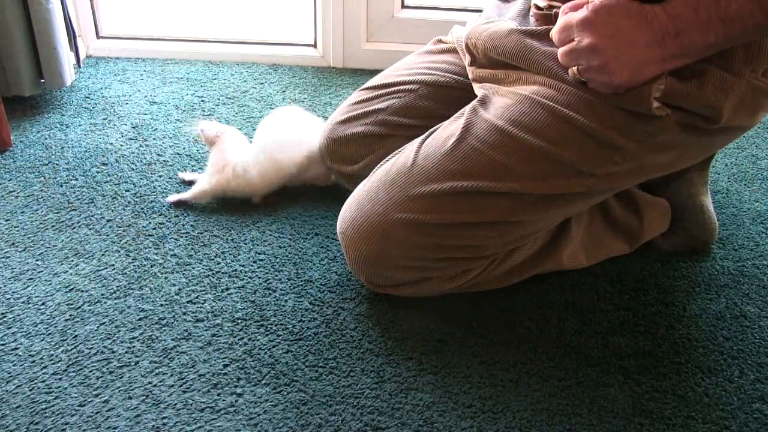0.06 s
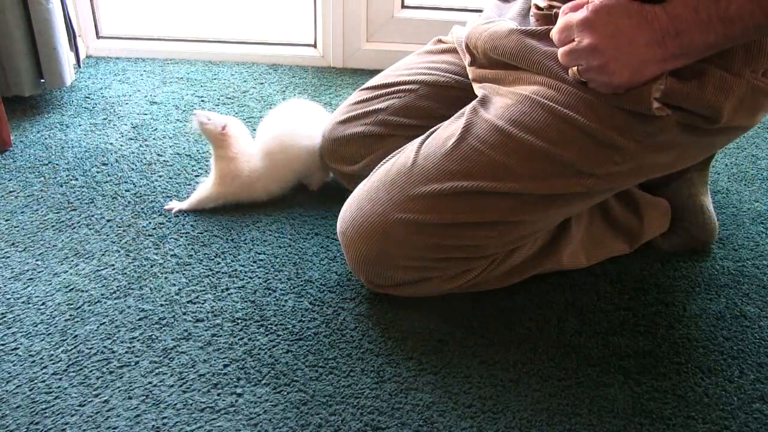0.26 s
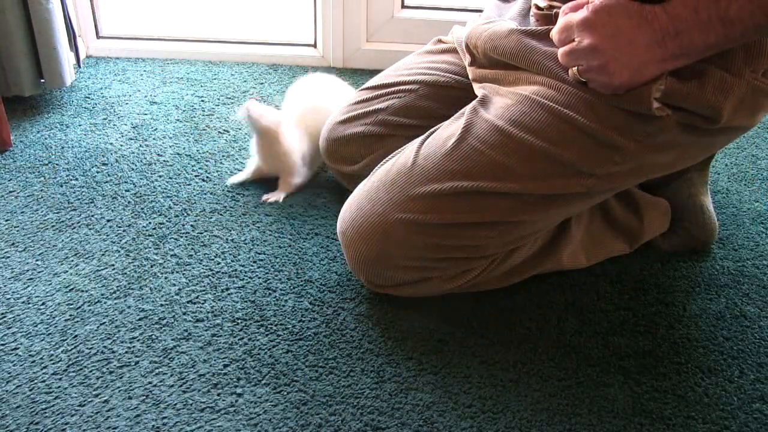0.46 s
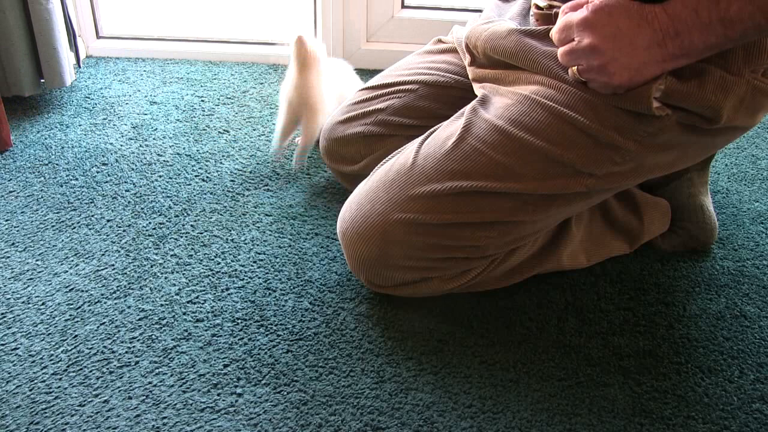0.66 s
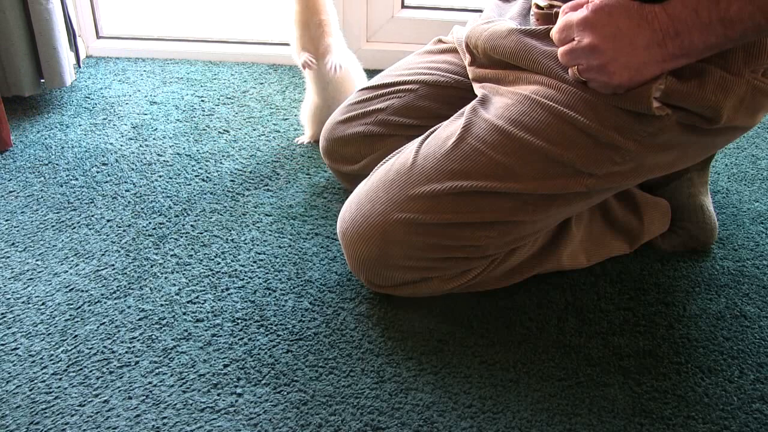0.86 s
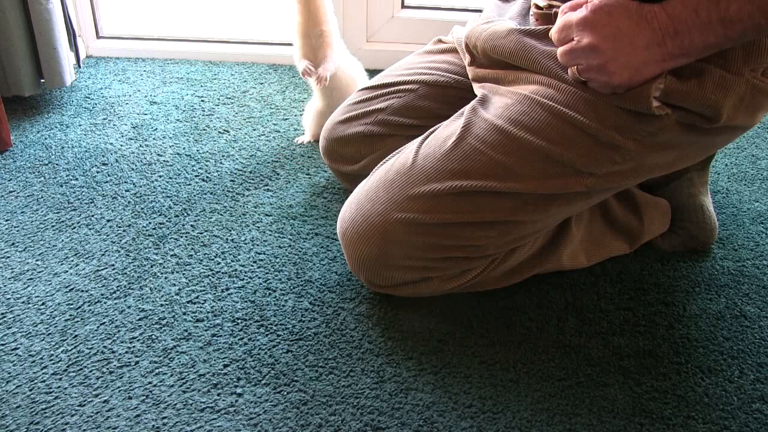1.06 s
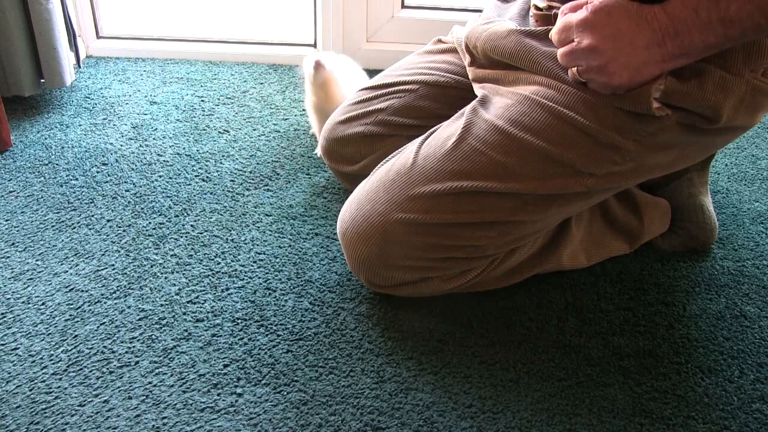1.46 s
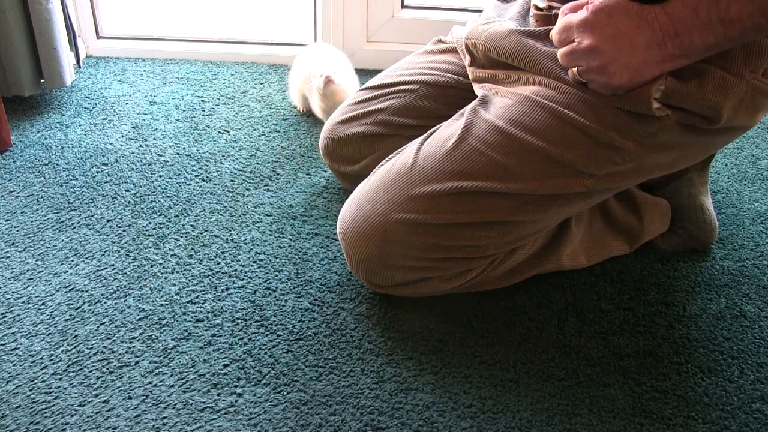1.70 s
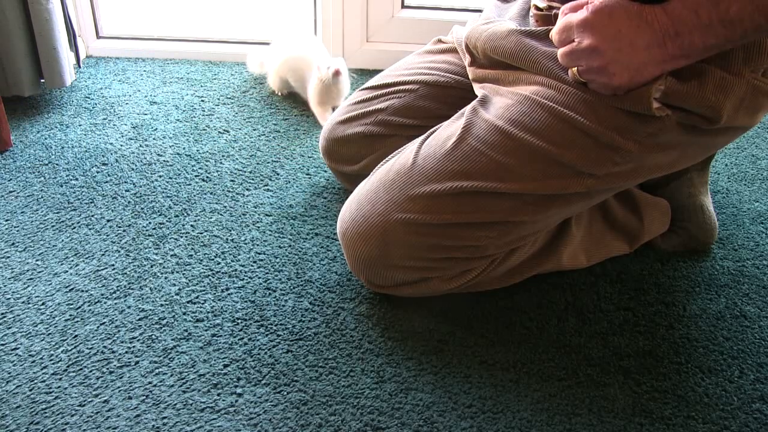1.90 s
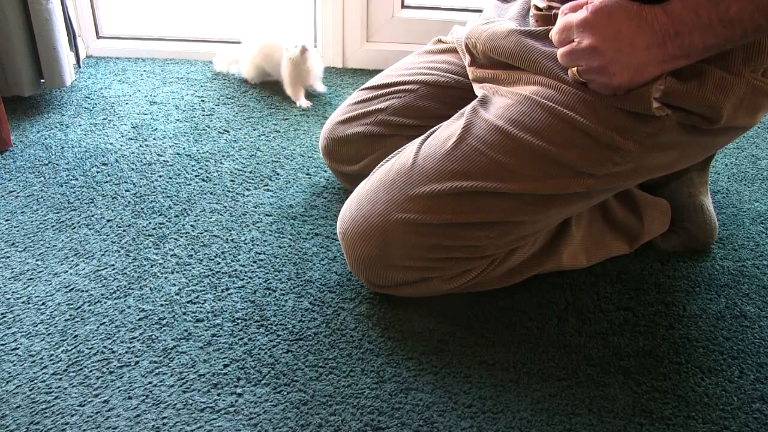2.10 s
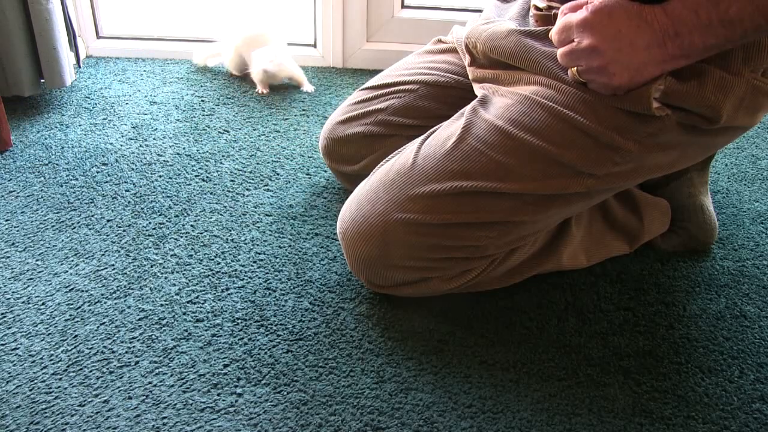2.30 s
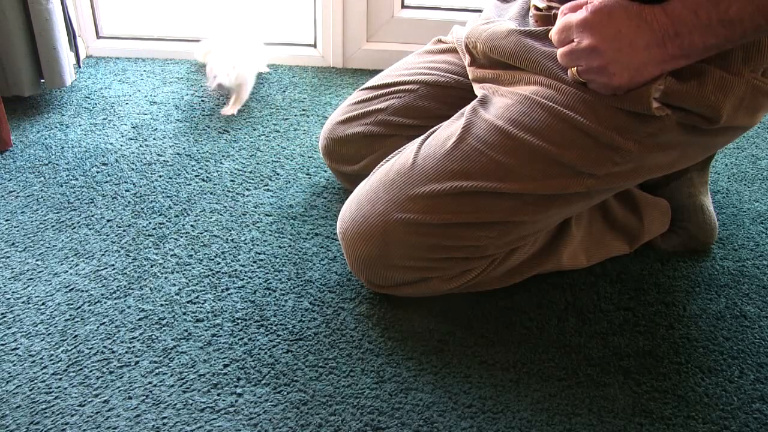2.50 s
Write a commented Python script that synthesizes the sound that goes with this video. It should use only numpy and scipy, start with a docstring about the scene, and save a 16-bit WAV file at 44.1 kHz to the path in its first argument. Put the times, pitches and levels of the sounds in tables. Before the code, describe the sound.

Quick, squeaky ferret chirps in a small room, with light bumps and two yaps further off.

```python
"""Soft scuffs and thumps over a faint hiss: a ferret romps on a carpet in a small room.
Quick, squeaky chirps follow, a low and a high kind, each a reedy harmonic tone whose pitch arches
and turns rough as it falls. A faint hum lies under the early ones. Two hoarse, hollow yaps, noise
ending in a tone, come from further off with a longer echo, like a dog in another room."""
import sys
import numpy as np
from scipy import signal
from scipy.fft import rfft, irfft, next_fast_len
from scipy.io import wavfile
from scipy.ndimage import uniform_filter1d, minimum_filter1d

SR = 44100
rng = np.random.default_rng(int(sys.argv[2]) if len(sys.argv) > 2 else 0)


def pcm_store(signal):
    """Save signal as 16-bit PCM."""
    levels = np.round(np.clip(np.atleast_2d(signal), -1, 1) * 32767)
    wavfile.write(sys.argv[1], SR, levels.astype(np.int16).T)


N = 116865
T = np.arange(N) / SR

# Spectra of the sources and the room. Each row: frequency in Hz, relative level in dB.
HISS_SPECTRUM = [(25, -10.5), (50, -10.5), (100, -2), (150, -7.5), (300, -6), (600, -5.5), (1200, -16),
                 (2500, -16), (5000, -19.5), (10000, -25), (15000, -31.5)]
SCUFF_SPECTRUM = [(500, -17.5), (1200, -6), (5000, -11), (10000, -12), (15000, -29)]
HIGH_CHIRP_SPECTRUM = [(1400, -26), (2800, -25), (4250, -21.5), (5650, -16), (7100, -26), (8500, -26.5),
                       (9900, -33.5), (11300, -29.5), (12800, -54), (14300, -95)]
LOW_CHIRP_SPECTRUM = [(1200, -23), (2400, -24), (3550, -22), (4000, -21.5), (4850, -15), (5300, -17),
                      (5950, -27.5), (7200, -39.5), (8300, -38.5), (9500, -31), (10650, -23.5),
                      (11800, -35), (13000, -39.5), (14300, -61)]
AIR_SPECTRUM = [(150, 5), (450, 0.5), (950, 19), (1600, -54.5), (2100, 20.5), (4800, -8), (7000, -21.5),
                (11000, 5.5), (14000, -34)]
YAP_SPECTRUM = [(80, -64), (200, -39), (380, -33.5), (520, -8), (760, -2), (900, -11), (1030, -3.5),
                (1250, -8), (1550, -26), (2200, -12.5), (3000, -44), (6000, -54), (14000, -80)]
ROOM_SPECTRUM = [(200, -2), (1200, 4.5), (2500, 4.5), (4800, 3.5), (7500, 3.5), (11000, 6.5), (15000, 6)]
# Brushes on the carpet. Each row: start in seconds, length in seconds, level in dB.
SCUFFS = [(0.062, 0.091, -57), (0.102, 0.0058, -56), (0.162, .03, -51)]
# Impacts on the floor. Each row: start in seconds, level in dB, centre in Hz, half-width in octaves,
# decay time constant in seconds.
THUMPS = [(.102, -41, 760, 0.61, .012), (.156, -42.5, 364, 0.45, 0.013), (0.17, -33.5, 398, 0.5, 0.028),
          (1.50, -44.5, 450, 0.8, 0.15), (1.69, -51.5, 238, 0.3, 0.035), (1.735, -46, 167, 0.096, .05),
          (1.80, -53, 151.7, .2, .06), (1.89, -45.5, 132, 0.22, .03)]
# Chirps. Each row: start and length in seconds; top pitch, rise and fall in Hz; level in dB;
# accents in dB on the fundamental, the third harmonic, the fourth's swell and the treble.
HIGH_CHIRPS = [ (.189, 0.07, 1432, 65, 241, 1, 0.42, 1.5, -3, -3.5),
               (.595, 0.057, 1447, 40, 238, 2.5, -0.4, 4, -0.5, -2.5),
               (1.438, .046, 1368, 30, 142.6, -1.5, 0.92, 2.5, 0.5, -5),
               (2.027, 0.06, 1413, 35, 200, 2, -2, -1, 0.5, -4)]
LOW_CHIRPS = [ (.284, 0.11, 1328, 150, 231.5, 3.5, 1, 3, 0.5, -2),
              (.482, 0.09, 1257, 90, 163, 1, 1, 3.5, 5.5, 1),
              (.693, 0.077, 1218, 50, 169, 0, -0.5, 1, 1.5, 1),
              (.873, 0.1, 1202, 35, 151, 0, 0.5, 0, -1, -1.5),
              (1.149, 0.064, 1184, 20, 140, -1, -1.5, 0, 2.5, -1),
              (1.350, .059, 1190, 20, 126, -2.5, 0, 1.5, -0.5, 1.5),
              (1.527, 0.091, 1225, 49, 139, -1.5, 3, 2, 11.5, 1.5),
              (2.131, 0.059, 1199, 20, 138, -2, -1, 2, -2, -0.5),
              (2.309, 0.092, 1183, 20, 161, -0.5, -2.5, 0, -7.5, -1.5)]
# The hum. One row: start and length in seconds, first and last pitch in Hz, level and octave gain in dB.
HUM = (.42, .32, 470, 435, -53, -10)
# Barks. Each row: the noise's start, swell and length in seconds and level in dB; then the tone's
# start and length in seconds, first and last pitch in Hz, level and octave gain in dB.
YAPS = [(0.843, 0.081, 0.1283, -25, .915, 0.1366, 633.4, 665.5, -30.5, -3.5),
        (1.520, 0.13, 0.177, -28.5, 1.600, .088, 693, 717.5, -25, -12.5)]
# Echoes from floor, door and legs. Each row: left and right delay in seconds, level in dB.
REFLECTIONS = [(.0052, 0.0033, -20), (0.0132, .0148, -21), (0.0193, 0.023, -25)]
# Level difference between the ears. Each row: frequency in Hz, left minus right in dB.
EAR_DIFFERENCE = [(250, 0.3), (700, 2.5), (1300, 2.5), (2500, 2.5), (5000, 3), (9000, 5.5), (12000, 0.5)]

HISS_DB, AIR_DB = -54.5, -54.5
THUMP_ATTACK_S = .0035
ARCH_TOP, ARCH_POWER = .41, 1.967  # the pitch peaks at this fraction of a chirp
SCOOP_HZ, SCOOP_S = 110, .0032
RISE_LOSS_DB, FALL_LOSS_DB, SWELL_NARROWING, TREBLE_HZ = 6, 12, 2.5, 6850
JITTER, END_JITTER, SHIMMER_DB, RASP_DB, END_RASP_DB = .002, .009, 2.31, -28, -4
FALL_SPREAD_DB = 10  # a chirp's falling end carries further into the room than its top
YAP_RELEASE_S, YAP_T60_S, YAP_DRY_DB, YAP_WET_DB = .017, .42, 2.5, 1
EARLY_T60_S, EARLY_DB, ROOM_GAP_S = .093, -13.5, .008
LATE_T60_S, LATE_DB, TREBLE_T60_S, DAMPING_HZ = .31, -12.5, .22, 6600
CEILING, LIMITER_S, CUTOFF_HZ = .86, .004, 16600


def from_db(db):
    """Amplitude grows tenfold for every 20 dB."""
    return 10 ** (np.asarray(db) / 20)


def unit_rms(x):
    """Normalisation to a mean power of one."""
    return x / np.sqrt(np.mean(x ** 2) + 1e-20)


def level_at(spectrum, hz):
    """Interpolation of decibels on a log-frequency axis."""
    frequencies, db = np.transpose(spectrum)
    return np.interp(np.log(np.maximum(hz, 1)), np.log(frequencies), db)


def coloured(x, spectrum):
    """Zero-phase filtering by multiplication in the frequency domain."""
    size = x.shape[-1]
    padded = next_fast_len(size)
    gain = from_db(level_at(spectrum, np.fft.rfftfreq(padded, 1 / SR)))
    return irfft(rfft(x, padded) * gain, padded)[..., :size]


def noise(spectrum):
    """Filtered white noise takes on the filter's spectrum; unit rms."""
    return unit_rms(coloured(rng.standard_normal(N), spectrum))


def wobble(rate_hz, size):
    """Low-passed noise serves as a random modulator with a spread near one."""
    settle = SR // 10
    white = rng.standard_normal(max(size, SR // 4) + settle)
    slow = signal.sosfilt(signal.butter(2, rate_hz, fs=SR, output="sos"), white)
    return unit_rms(slow)[settle:settle + size]


def stereo_noise(size, side_db):
    """Partial coherence: the ears share a mid noise and get a side noise in opposite phase."""
    mid, side = rng.standard_normal((2, size))
    return unit_rms(mid + from_db(side_db) * side * np.array([[1], [-1]]))


def gate(t, length, attack, release):
    """An amplitude envelope with a sine attack and a sine-squared release."""
    opening = np.sin(np.pi / 2 * np.clip(t / attack, 0, 1))
    closing = np.sin(np.pi / 2 * np.clip((length - t) / release, 0, 1))
    return opening * closing ** 2


def hiss():
    """Stationary noise, largely coherent between the ears, forms the room's background."""
    return from_db(HISS_DB) * unit_rms(coloured(stereo_noise(N, side_db=-9), HISS_SPECTRUM))


def scuffs():
    """Friction of fur and claws on carpet makes short swells of broadband noise."""
    brush = noise(SCUFF_SPECTRUM)
    return sum(from_db(db) * brush * gate(T - start, length, length / 2, length / 2)
               for start, length, db in SCUFFS)


def thumps():
    """Damped impacts on the carpeted floor: bands of noise that decay exponentially."""
    out = np.zeros(N)
    for start, db, hz, octaves, decay in THUMPS:
        band = signal.butter(2, [hz * 2 ** -octaves, hz * 2 ** octaves], "band", fs=SR, output="sos")
        rumble = unit_rms(signal.sosfilt(band, rng.standard_normal(N)))
        t = np.maximum(T - start, 0)
        envelope = np.minimum(t / THUMP_ATTACK_S, 1) * np.exp(-t / decay)
        out += from_db(db) * rumble * envelope
    return out


def chirps(rows, spectrum):
    """Random modulation roughens an arching harmonic tone as it falls. Gives direct sound, room feed."""
    direct, room_feed = np.zeros((2, N))
    air = from_db(AIR_DB) * noise(AIR_SPECTRUM)
    for start, length, top_hz, rise_hz, fall_hz, db, base_db, third_db, swell_db, treble_db in rows:
        first, size = int(start * SR), int(length * SR)
        span, t = slice(first, first + size), T[:size]
        rising = np.clip(1 - t / length / ARCH_TOP, 0, 1) ** ARCH_POWER  # 1 to 0 before the top
        falling = np.clip((t / length - ARCH_TOP) / (1 - ARCH_TOP), 0, 1) ** ARCH_POWER  # 0 to 1 after
        pitch = top_hz - rise_hz * rising - fall_hz * falling - SCOOP_HZ * np.exp(-t / SCOOP_S)
        jitter = (JITTER + END_JITTER * falling) * wobble(rate_hz=300, size=size)
        phase = 2 * np.pi * np.cumsum(pitch * (1 + jitter)) / SR
        near_top = np.clip(1 - SWELL_NARROWING * (rising + falling), 0, 1)
        accents_db = {1: base_db, 3: third_db, 4: swell_db * near_top}
        rasp_depth = from_db(RASP_DB) + from_db(END_RASP_DB) * falling
        tone = air[span].copy()
        for k in range(1, 13):
            accent_db = accents_db.get(k, 0) + treble_db * (k * top_hz > TREBLE_HZ)
            rasp = rasp_depth * min(k / 4, 1) * wobble(rate_hz=150, size=size)
            shimmer_db = SHIMMER_DB * wobble(rate_hz=54, size=size)
            amplitude = from_db(level_at(spectrum, k * pitch) + accent_db + shimmer_db)
            tone += amplitude * (1 + rasp) * np.sin(k * phase)
        tone *= gate(t, length, attack=.0047, release=.01)
        tone *= from_db(db - RISE_LOSS_DB * rising - FALL_LOSS_DB * falling)
        direct[span] += tone
        room_feed[span] += tone * from_db(FALL_SPREAD_DB * falling)
    return np.array([direct, room_feed])


def hollow_tone(start, length, first_hz, last_hz, octave_db, jitter, jitter_hz):
    """A gliding fundamental and its octave waver by random frequency modulation."""
    glide = np.interp(T, [start, start + length], [first_hz, last_hz])
    pitch = glide * (1 + jitter * wobble(jitter_hz, N))
    phase = 2 * np.pi * np.cumsum(pitch) / SR
    return np.sin(phase) + from_db(octave_db) * np.sin(2 * phase)


def hum():
    """A faint tone of two harmonics swells and fades while its pitch sinks a little."""
    start, length, first_hz, last_hz, db, octave_db = HUM
    tone = hollow_tone(start, length, first_hz, last_hz, octave_db, jitter=.03, jitter_hz=91)
    return from_db(db) * tone * gate(T - start, length, length / 2, length / 2)


def yaps():
    """Hoarse noise ends in a hollow tone; reverberation nearly as strong as the bark conveys distance."""
    barks = np.zeros(N)
    hoarse = noise(YAP_SPECTRUM)
    for start, swell, length, noise_db, onset, duration, first_hz, last_hz, tone_db, octave_db in YAPS:
        barks += from_db(noise_db) * hoarse * gate(T - start, length, swell, YAP_RELEASE_S) ** 2
        tone = hollow_tone(onset, duration, first_hz, last_hz, octave_db, jitter=.022, jitter_hz=139)
        barks += from_db(tone_db) * tone * gate(T - onset, duration, attack=.046, release=YAP_RELEASE_S)
    echo = signal.fftconvolve(barks[None], diffuse_tail(YAP_T60_S), axes=1)[:, :N]
    return from_db(YAP_DRY_DB) * barks + from_db(YAP_WET_DB) * echo


def diffuse_tail(t60):
    """Dense reflections merge into noise that falls 60 dB in t60 seconds; unit energy."""
    t = T[:int(.75 * SR)]
    response = stereo_noise(len(t), side_db=-1) * from_db(-60 * t / t60) * (t > ROOM_GAP_S)
    return unit_rms(response) / np.sqrt(len(t))


def room(x):
    """Convolution with distinct echoes, a quick diffuse wash and a tail whose treble is damped first."""
    low, high = (signal.butter(4, DAMPING_HZ, kind, fs=SR, output="sos") for kind in ("low", "high"))
    late = signal.sosfilt(low, diffuse_tail(LATE_T60_S))
    late += signal.sosfilt(high, diffuse_tail(TREBLE_T60_S))
    response = from_db(LATE_DB) * late + from_db(EARLY_DB) * diffuse_tail(EARLY_T60_S)
    for left_s, right_s, db in REFLECTIONS:
        response[[0, 1], [int(left_s * SR), int(right_s * SR)]] += from_db(db)
    response = coloured(response, ROOM_SPECTRUM)[:, :SR // 2]
    return signal.fftconvolve(x[None], response, axes=1)[:, :N]


def scene():
    """The sources superpose; an interaural level difference sets all but the hiss a little to the left."""
    voice = chirps(LOW_CHIRPS, LOW_CHIRP_SPECTRUM) + chirps(HIGH_CHIRPS, HIGH_CHIRP_SPECTRUM)
    direct, room_feed = voice + thumps() + scuffs()
    background = hiss()
    left, right = direct + room(room_feed) + yaps() + hum()
    left = coloured(left, [(hz, db / 2) for hz, db in EAR_DIFFERENCE])
    right = coloured(right, [(hz, -db / 2) for hz, db in EAR_DIFFERENCE])
    return np.array([left, right]) + background


def record(dry):
    """Peak limiting holds the loudest chirps down; a steep low-pass removes the highest treble."""
    size = int(LIMITER_S * SR)
    needed_gain = CEILING / np.maximum(np.abs(dry).max(axis=0), CEILING)
    gain = uniform_filter1d(minimum_filter1d(needed_gain, 2 * size), size)
    return signal.sosfilt(signal.cheby2(14, 70, CUTOFF_HZ, fs=SR, output="sos"), dry * gain)


dry = scene()
out = record(dry)
pcm_store(out)
```